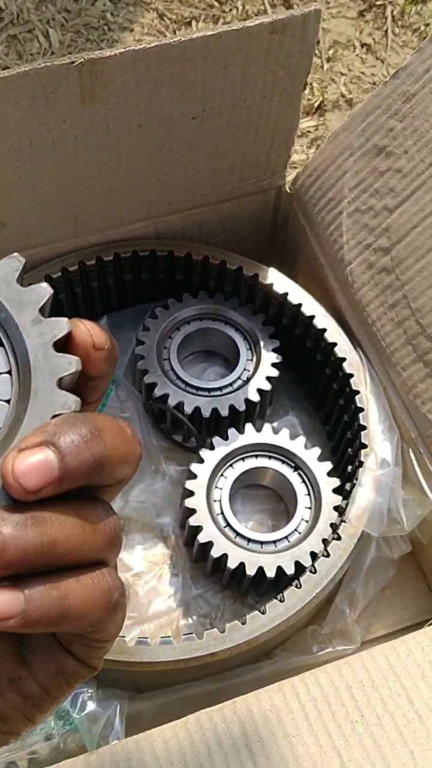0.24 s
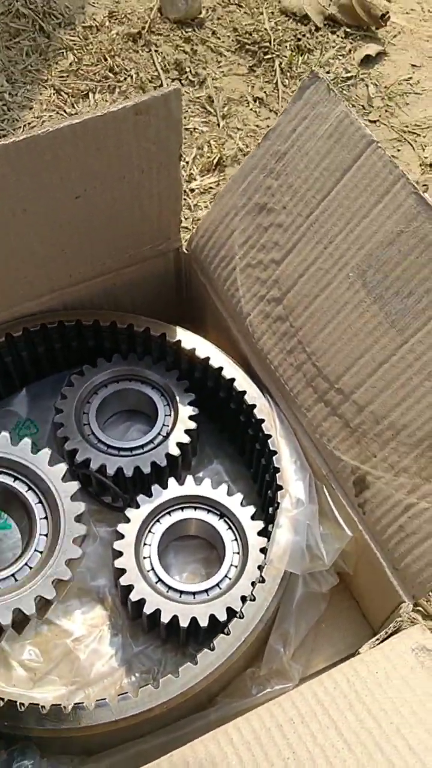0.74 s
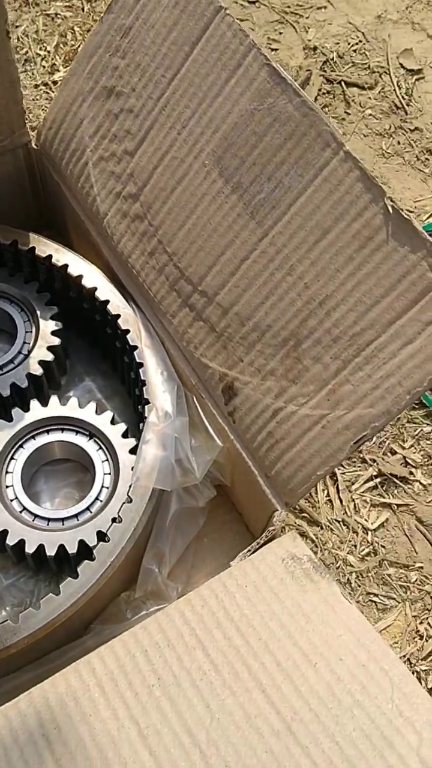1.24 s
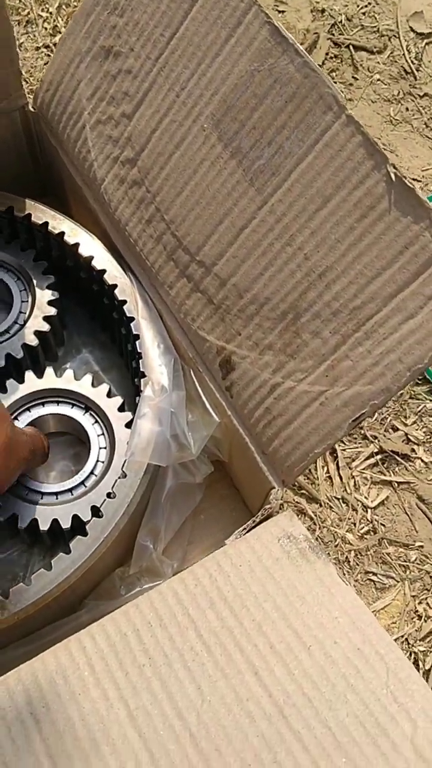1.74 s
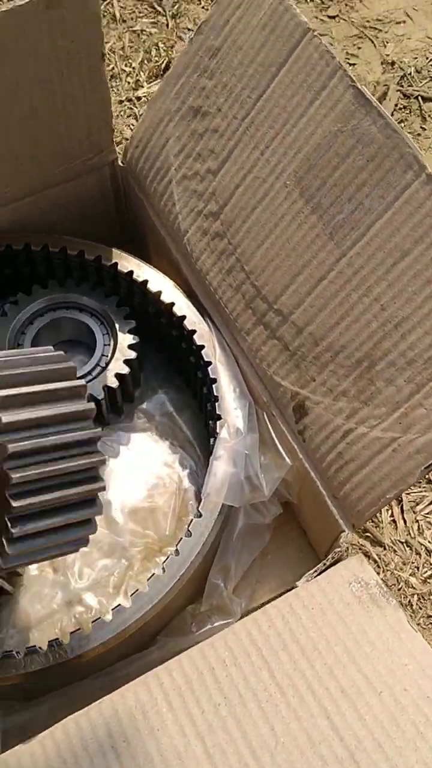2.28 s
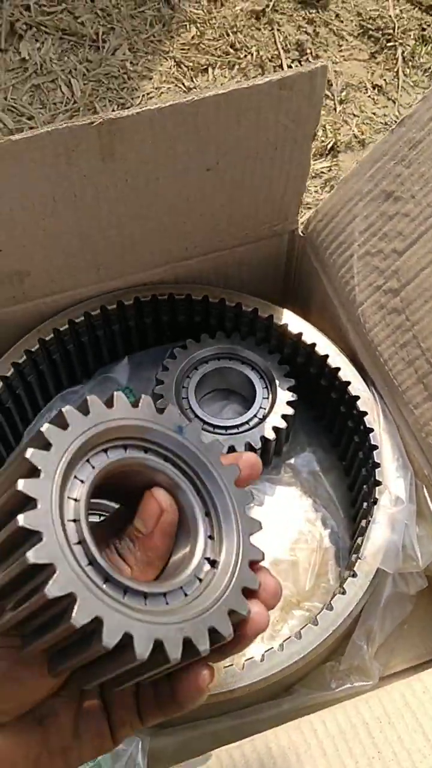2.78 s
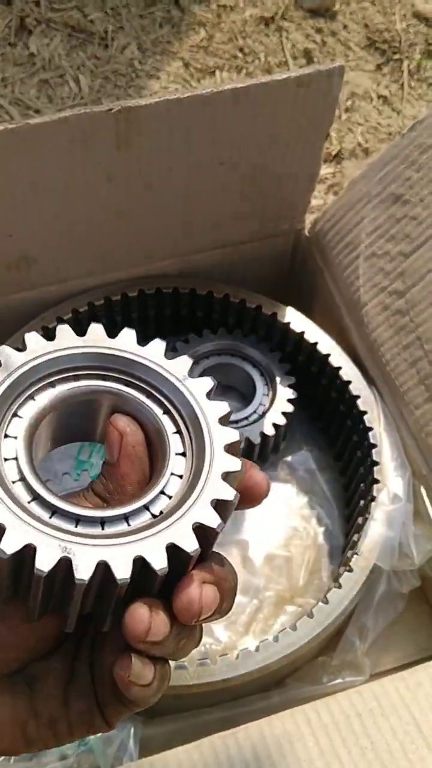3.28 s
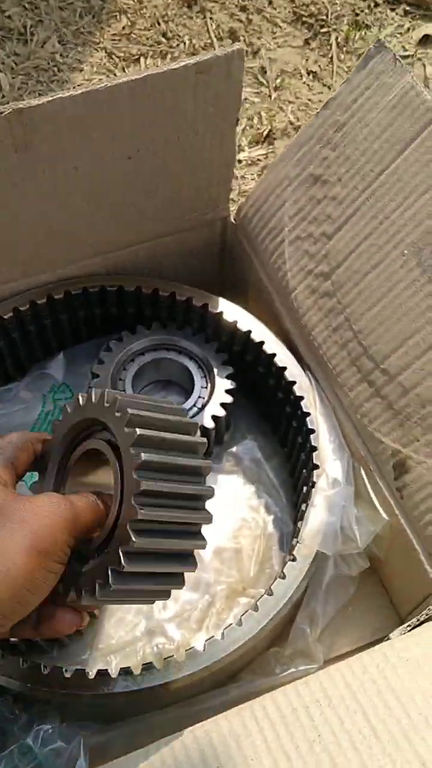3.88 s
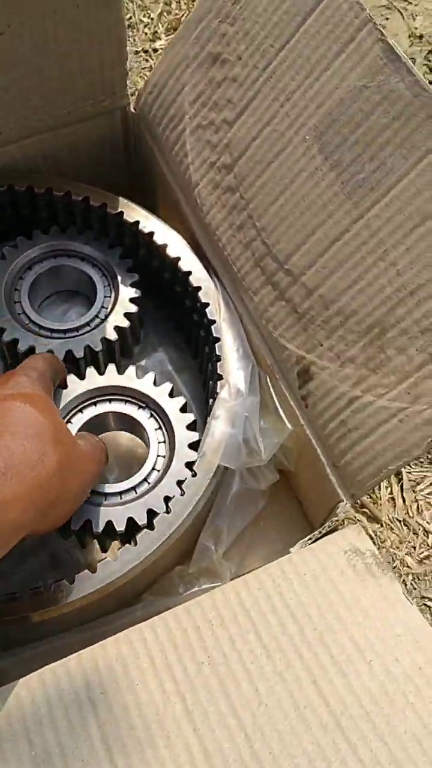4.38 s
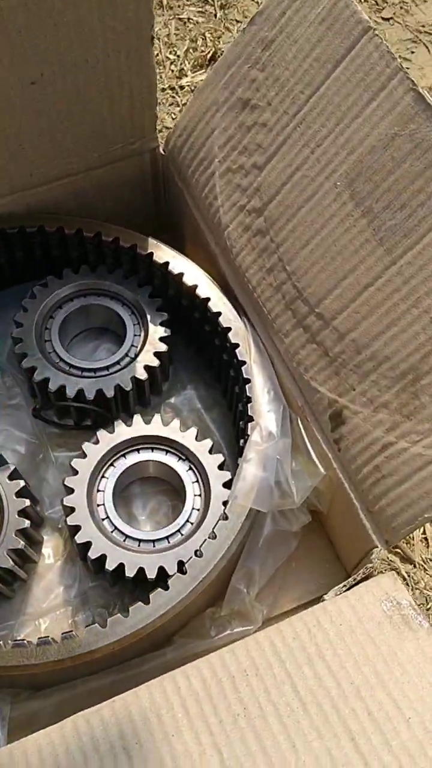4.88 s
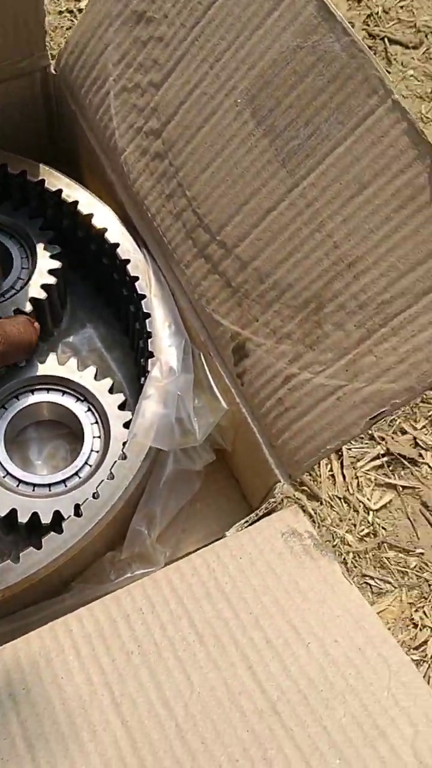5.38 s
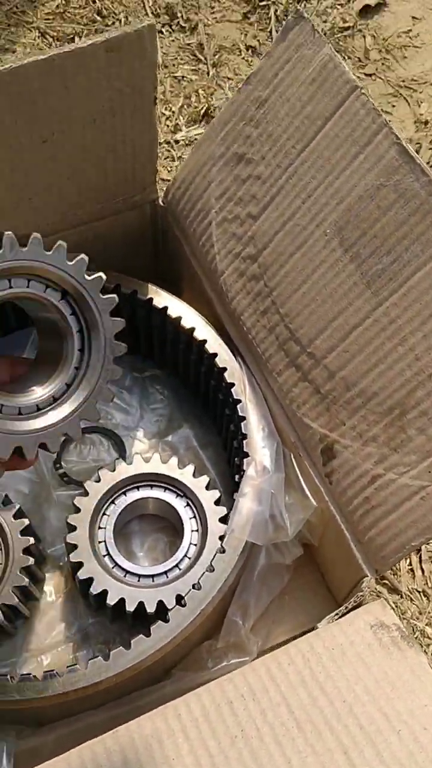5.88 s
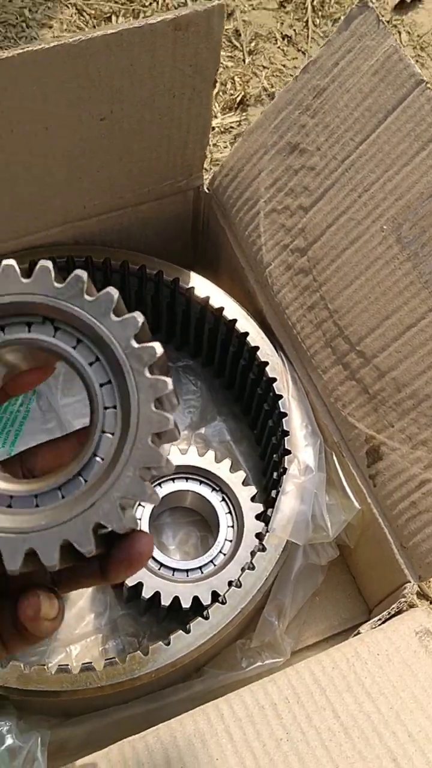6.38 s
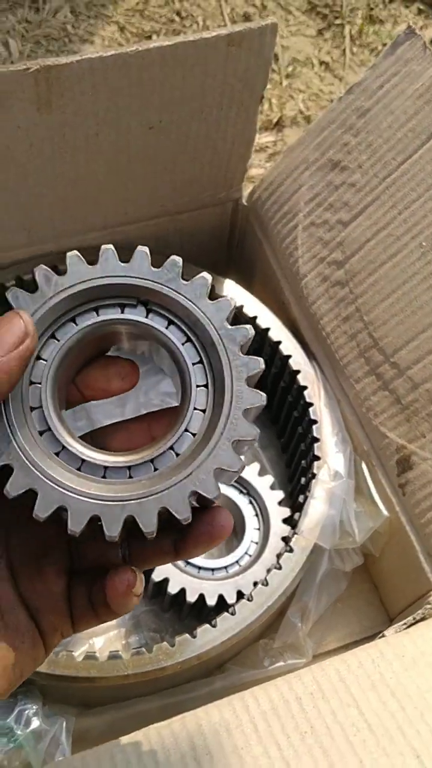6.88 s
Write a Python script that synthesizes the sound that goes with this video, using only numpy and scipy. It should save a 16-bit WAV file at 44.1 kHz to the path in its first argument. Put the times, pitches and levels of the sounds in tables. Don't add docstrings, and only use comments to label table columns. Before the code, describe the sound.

Heavy steel parts are handled in a cardboard box in open air, recorded near by phone. Short, quickly muffled clangs of a big toothed ring alternate with fine gritty ticks, finger rubbing, plastic film crackle and dull box thuds. Lifted gears give thin, high, flickering rings as their rollers brush inside. Faint wind, a far motor and a tiny bird whistle fill the gaps.

```python
import sys
import numpy as np
from scipy import signal
from scipy.io import wavfile
from scipy.ndimage import uniform_filter1d

SR = 44100
rng = np.random.default_rng(int(sys.argv[2]) if len(sys.argv) > 2 else 0)


def volts_from_decibels(level):
    exponent = np.asarray(level, float) / 20
    return 10 ** exponent


def generate_wav(sig):
    pcm = np.round(np.clip(np.atleast_2d(sig).T, -1, 1) * 32767).astype(np.int16)
    wavfile.write(sys.argv[1], SR, pcm)


N = 314874


def evened(x):
    return x / np.sqrt(np.mean(x ** 2) + 1e-20)


def add(mix, start_s, sound):
    part = mix[round(start_s * SR):][:len(sound)]
    part += sound[:len(part)]


def curve(rows, column):
    rows = np.asarray(rows)
    return np.interp(np.arange(N) / SR, rows[:, 0], rows[:, column])


def swells(rows, rest_db, bend):
    t = np.arange(0, N / SR + .01, .002)
    power = volts_from_decibels(2 * rest_db)
    for peak_s, *spans_s, level_db in rows:
        span_s = np.where(t < peak_s, spans_s[0], spans_s[-1])
        fall_db = 20 * (abs(t - peak_s) / span_s) ** bend
        power = power + volts_from_decibels(2 * (level_db - fall_db))
    return np.interp(np.arange(N) / SR, t, 10 * np.log10(power))


def resonate(x, hz, width_hz):
    turn = np.exp(2j * np.pi * np.cumsum(hz * np.ones(len(x))) / SR)
    r = np.exp(-np.pi * width_hz / SR)
    return 2 * (turn * signal.lfilter([1 - r], [1, -r], x / turn)).real


def band(x, lo_hz, hi_hz):
    return signal.sosfilt(signal.butter(2, [lo_hz, hi_hz], "bandpass", fs=SR, output="sos"), x)


def noise(points, patchy_db, flicker_db, size):
    frames, hz = 4 * N // size + 5, np.fft.rfftfreq(size, 1 / SR)
    a, b, patches = rng.standard_normal((frames, len(hz), 3)).T
    patches = uniform_filter1d(patches, size=7, axis=0)
    patches = evened(uniform_filter1d(patches, size=9, axis=1))
    flicker = np.minimum(rng.exponential(1, frames), 4)
    point_hz, point_db = np.transpose(points)
    colour_db = np.interp(np.log(hz + 1), np.log(point_hz + 1), point_db, -90, -90)
    z = (a + 1j * b) * volts_from_decibels(colour_db[:, None] + patchy_db * patches + flicker_db * flicker)
    return evened(signal.istft(z, nperseg=size, noverlap=3 * size // 4)[1][:N])


# freq_hz, density_db
WIND_COLOUR = [(8.8, -34.5), (15, -1), (52, 7), (210, -15), (330, -14), (430, -29), (730, -120)]
# peak_s, swell_and_fade_20db_s, level_db
WIND_GUSTS = [(0, 0.6, -67), (.75, .8, -68), (1.25, 0.7, -58), (1.97, 0.24, -51), (2.75, .6, -57),
              (3.9, .3, -59), (4.25, 0.19, -49), (4.65, .8, -61), (5.1, .6, -58), (5.8, .5, -56),
              (6.2, 1.2, -63)]


def wind():
    level_db = swells(WIND_GUSTS, rest_db=-71, bend=1.3)
    return volts_from_decibels(level_db) * noise(WIND_COLOUR, patchy_db=2.0, flicker_db=0.0, size=4096)


# time_s, firing_hz, level_db
ENGINE_FIRING = [(0, 95, -70), (.6, 99, -63), (1.5, 107, -67), (2.5, 116, -60), (3.0, 105, -64),
                 (3.5, 88, -69), (3.7, 85, -86), (4.3, 99, -80), (4.6, 100, -65), (5.15, 101, -66),
                 (5.4, 98, -78), (7.14, 96, -82)]
ENGINE_ORDERS = [-3, -2.5, -14, -10]
# freq_hz, width_hz, level_db
ENGINE_HUMS = [
    (48.5, 3, -73),
    (288, 8, -77),
]


def engine():
    turns = np.cumsum(curve(ENGINE_FIRING, 1)) / SR
    drone = 0
    for k, order_db in enumerate(ENGINE_ORDERS):
        waver = uniform_filter1d(rng.standard_normal(N), size=5000)
        waver = evened(uniform_filter1d(waver, size=5000))
        drone = drone + volts_from_decibels(order_db + 3.5 * waver) * np.sin(np.pi * (k + 1) * turns + 0.6 * waver)
    out = volts_from_decibels(curve(ENGINE_FIRING, 2) + 3) * drone
    air = rng.standard_normal(N)
    for hz, width_hz, level_db in ENGINE_HUMS:
        out += volts_from_decibels(level_db) * evened(resonate(resonate(air, hz, width_hz), hz, 3 * width_hz))
    return out


# [time_s, pitch_hz]
BIRD_NOTES = [
    (-69, [(2.765, 5600), (2.78, 6050), (2.825, 6250)]),
    (-76, [(2.81, 6200), (2.88, 6450)]),
    (-72, [(2.755, 10300), (2.77, 10650), (2.79, 10400)]),
    (-81, [(2.96, 5740), (3.0, 5740), (3.07, 4200)]),
    (-88, [(6.585, 6540), (6.605, 6900), (6.63, 7180), (6.67, 7330), (6.69, 7220)]),
    (-88, [(6.705, 7050), (6.74, 7380), (6.80, 6950), (6.83, 7150), (6.87, 7750), (6.905, 7950), (6.925, 7450), (7.0, 6800)]),
    (-93, [(6.555, 8650), (6.60, 9650)]),
    (-93, [(6.69, 9150), (6.74, 9150), (6.77, 8800), (6.81, 8800)]),
    (-93, [(6.86, 9000), (6.89, 9000)]),
    (-94, [(6.95, 9450), (7.02, 9450)]),
]


def bird():
    out = np.zeros(N)
    for level_db, rows in BIRD_NOTES:
        time_s, pitch_hz = np.transpose(rows)
        t = np.arange(time_s[0], time_s[-1], 1 / SR)
        glide_hz = np.interp(t, time_s, pitch_hz)
        tone = np.sin(2 * np.pi * np.cumsum(glide_hz) / SR)
        blur = evened(resonate(rng.standard_normal(len(t)), glide_hz, 200))
        blur_share = 1.1 if pitch_hz.mean() < 6500 else 0.3
        add(out, time_s[0], volts_from_decibels(level_db) * (tone + blur_share * blur) * signal.windows.tukey(len(t), .25))
    return out


# peak_s, swell_20db_s, fade_20db_s, level_db
GRIP_BUFFETS = [
    (1.97, .08, .08, -57),
    (2.5, .1, .1, -63),
    (4.25, .12, .12, -52),
    (4.46, .06, .06, -60),
]


def grip():
    thump = evened(band(band(rng.standard_normal(N), 25, 170), 20, 200))
    return volts_from_decibels(swells(GRIP_BUFFETS, rest_db=-110, bend=1.5)) * thump


HANDS_STILL_DB = -87
# freq_hz, density_db
YARD_COLOUR = [(76, -29), (130, -5.5), (256, -15), (294, -11), (317, -8), (484, -14.5), (2620, -15.5),
               (4800, -33.5), (6240, -59.5), (10600, -120)]


def yard(hands_db):
    effort_db = uniform_filter1d(np.minimum(hands_db, -56), size=3500) - HANDS_STILL_DB
    return volts_from_decibels(-73 + .57 * effort_db) * noise(YARD_COLOUR, patchy_db=2.5, flicker_db=1.3, size=1024)


# freq_hz, density_db
RUB_COLOUR = [(1500, -22), (3300, -3.5), (5000, -6), (7600, -1.5), (9300, -10.5), (11500, -14)]


def rub(hands_db):
    return volts_from_decibels(hands_db - 0.5) * noise(RUB_COLOUR, patchy_db=1.5, flicker_db=2.8, size=256)


# freq_hz, density_db
FIZZ_COLOUR = [(8500, -22), (10300, -12), (13000, -5), (15000, 1), (15720, 2)]


def fizz(hands_db):
    return volts_from_decibels(hands_db + 5.5) * noise(FIZZ_COLOUR, patchy_db=2.0, flicker_db=2.5, size=256)


def slips(per_s, spread_db, most):
    strength = volts_from_decibels(spread_db * np.minimum(rng.exponential(1, N), most))
    return strength * (rng.random(N) < per_s / SR) * rng.standard_normal(N)


def crackle(hands_db):
    crease = rng.standard_normal(90) * np.exp(-np.arange(90) / 25)
    pops = signal.oaconvolve(slips(per_s=900, spread_db=4.5, most=4), crease)[:N]
    return volts_from_decibels(np.minimum(hands_db, -54) - 6) * evened(band(pops, 2000, 9000))


# peak_s, swell_20db_s, fade_20db_s, level_db
HAND_STROKES = [(0, .1, .5, -79), (.72, 0.27, 0.18, -65.5), (1.1, 0.54, 0.5, -73),
                (1.262, 0.05, 0.07, -53.5), (1.3, .03, .055, -41), (1.37, 0.07, 0.23, -62),
                (1.68, 0.05, 0.04, -58.5), (1.72, 0.05, 0.01, -58), (1.84, 0.15, 0.05, -61.5),
                (1.93, 0.1, 0.32, -63), (2.075, 0.0553, 0.1829, -55.5), (2.48, .5, 0.36, -62.5),
                (2.73, .3, .05, -67), (3.0, 1, 1, -80.5), (3.97, 0.2, 0.28, -67.5), (4.3, 0.44, 0.7, -73),
                (4.588, 0.0534, 0.0351, -44), (4.62, 0.22, 0.29, -62.5), (5.05, 0.24, 0.22, -65.5),
                (5.38, 0.3, 0.24, -71), (5.57, 0.23, .22, -55.5), (5.975, .3, .04, -62),
                (6.05, 0.3, .45, -71)]


def hands():
    hands_db = swells(HAND_STROKES, HANDS_STILL_DB, bend=1.415)
    return yard(hands_db) + rub(hands_db) + fizz(hands_db) + crackle(hands_db)


# start_s, pitch_hz, level_db
FINGER_PATS = [(4.497, 1300, -36), (4.566, 2050, -30), (4.577, 2200, -27), (4.588, 2100, -31),
               (4.597, 2250, -32), (4.715, 1200, -44), (5.538, 2250, -39), (5.418, 3100, -48),
               (5.605, 2100, -42), (5.615, 2400, -43), (5.642, 2300, -41), (5.655, 2500, -43),
               (5.527, 2150, -37), (4.153, 850, -47), (4.177, 970, -43), (1.684, 2300, -38),
               (1.712, 2300, -40), (1.747, 2250, -32), (2.915, 1000, -51), (2.915, 2000, -51)]


def pats():
    out, t = np.zeros(N), np.arange(1500) / SR
    for start_s, pitch_hz, level_db in FINGER_PATS:
        push = rng.standard_normal(len(t)) * t * np.exp(-t / 0.0029)
        body = resonate(push, pitch_hz, width_hz=140)
        add(out, start_s, volts_from_decibels(level_db) * body / abs(body).max())
    return out


# start_s, grit_on_steel_db, film_snap_db
LIGHT_TICKS = [(0.5292, -63, -45), (1.0844, -44.5, -62), (1.1278, -46, -45), (1.1553, -45.5, -50.5),
               (1.2734, -33, -34), (1.2964, -18, -27), (1.38, -45.5, -32.5), (1.5506, -56, -43),
               (1.6663, -35, -47), (1.8981, -53, -45.5), (3.3316, -49, -40), (3.5074, -53, -51),
               (3.7155, -58, -53), (4.59, -27.5, -50), (4.6907, -44, -55), (3.197, -55, -64),
               (4.753, -43, -42), (4.8294, -47.5, -55), (4.9631, -47, -47), (5.5144, -38, -41),
               (5.6394, -42, -46), (6.3639, -50, -64),
               (1.264, -36, -45), (1.772, -42, -42), (1.9178, -56, -48), (1.9333, -52, -44),
             (1.9717, -50, -50), (1.9936, -47, -50), (2.039, -52, -48), (2.049, -45, -42),
             (2.056, -47, -44), (2.073, -40, -38), (2.122, -40, -40), (2.131, -50, -42), (2.147, -43, -44),
             (3.347, -52, -50), (4.5653, -28, -30), (4.597, -33, -40), (4.666, -40, -48), (4.711, -52, -55),
             (4.725, -50, -55), (4.778, -51, -55), (4.8785, -56, -60), (4.897, -48, -56),
             (4.9803, -46, -50), (5.0272, -52, -54), (5.0377, -49, -52), (5.095, -48, -50)]
# start_s, blow_db, steel_edge_db, film_snap_db
BOX_KNOCKS = [(0.9343, -49.5, -52, -60.5), (1.1742, -25, -46, -53), (1.2535, -29, -21, -38),
              (1.6811, -30.5, -40, -28), (1.709, -40, -32.5, -45), (1.9505, -31, -48, -38),
              (2.6898, -43, -43.5, -43), (2.7137, -44, -39, -41), (2.724, -43, -43, -40),
              (3.3937, -52, -46, -47), (3.4281, -51, -48, -44), (2.7352, -45.5, -50, -42),
              (4.5777, -27, -22, -20), (5.4805, -29, -32, -44), (5.5053, -49, -56, -39),
              (5.5683, -22, -28, -43), (5.665, -33, -38, -41)]
# start_s, blow_db, steel_edge_db, film_snap_db
TOOTH_CLINKS = [(0.618, -44.5, -37.5, -59), (1.3034, -16, -21.5, -32), (1.7469, -31, -29, -29),
                (2.0288, -31.5, -33.5, -31), (2.0822, -17, -31, -20), (2.096, -20, -32, -39),
                (2.105, -26, -55.5, -42), (2.1131, -31, -46.5, -33), (3.3498, -41, -35, -46),
                (4.4273, -21, -44, -53.5), (4.4543, -12, -29, -56), (5.4041, -39, -43.5, -52),
                (5.5242, -38, -31, -50), (5.5851, -29.5, -28, -36), (5.6264, -31.5, -38, -49),
                (6.1597, -44, -50, -54)]
# start_s, thud_db
KNUCKLE_BUMPS = [
    (1.257, -33),
    (1.31, -36),
    (1.335, -40),
    (4.557, -43),
    (4.572, -40),
    (4.61, -44),
    (5.609, -45),
    (2.1452, -38.5),
    (4.6663, -41),
    (6.089, -49.5),
]
# freq_hz, width_hz, level_db
BOX_MODES = [
    (410, 95, 9),
    (310, 60, 2),
]
SNAP_COLOUR = [-1, 3, -1, 2]


def ticks():
    events = LIGHT_TICKS
    for rows, thud_under_blow_db in ((BOX_KNOCKS, -11), (TOOTH_CLINKS, -23.5)):
        for start_s, blow_db, edge_db, film_db in rows:
            events = events + [(start_s, edge_db, film_db, blow_db, blow_db + thud_under_blow_db)]
    for start_s, thud_db in KNUCKLE_BUMPS:
        events = events + [(start_s, thud_db - 14, thud_db - 10, thud_db - 16, thud_db)]

    out, t = np.zeros(N), np.arange(1600) / SR
    push = np.exp(-(t / .0004 - 2) ** 2)
    thud = sum(volts_from_decibels(db) * resonate(push, hz, width_hz) for hz, width_hz, db in BOX_MODES)
    for start_s, *levels_db in events:
        snap = rng.standard_normal(len(t)) * t * np.exp(-t / rng.uniform(0.00031, 0.0015))
        steel = band(snap, 3000, 10000)
        air = band(band(snap, 13000, 17500), 10000, 17500)
        body = band(band(snap, 760, 3600), 800, 3300)
        for part, level_db, colour_db in zip((steel, air, body, thud), levels_db, SNAP_COLOUR):
            add(out, start_s - .0007, volts_from_decibels(level_db + colour_db) * part / abs(part).max())
    return out


# peak_s, swell_20db_s, fade_20db_s, level_db
DRAG_PULLS = [
    (4.24, 0.2, 0.25, -65),
    (4.575, 0.03, 0.0457, -42),
    (4.65, 0.08, 0.16, -53.5),
    (5.1, 0.19, .07, -55.5),
    (5.52, .12, .16, -46),
    (5.64, .1, 0.05, -49),
    (2.5, .12, .1, -60),
]
# freq_hz, width_hz, level_db
DRAGGED_BANDS = [(430, 60, -6), (943, 98, -7), (1155, 34, -1.5), (2150, 200, -5), (2600, 70, -10)]


def drag():
    teeth = slips(per_s=2000, spread_db=4, most=3)
    body = 0
    for hz, width_hz, level_db in DRAGGED_BANDS:
        shaken = resonate(resonate(teeth, hz, 2.8 * width_hz), hz, 5 * width_hz)
        body = body + volts_from_decibels(level_db) * evened(shaken)
    return evened(body) * volts_from_decibels(swells(DRAG_PULLS, rest_db=-110, bend=1.2))


# start_s, level_db, pitch_hz of the loaded rim
ROCK_CONTACTS = [(5.440, -46, 1190), (5.452, -50, 1180), (5.471, -45, 1180), (5.481, -37, 1210),
                 (5.488, -35, 1190), (5.496, -34, 1200), (5.504, -32, 1220), (5.511, -29, 1185),
                 (5.520, -33, 1170), (5.527, -29, 1155), (5.538, -31, 1150), (5.548, -36, 1145),
                 (5.560, -39, 1145), (5.575, -42, 1145)]
# freq_hz, level_db, t60_s
ROCK_SIDE_MODES = [(940, -9, .05), (1400, -6, .03), (2180, -14, .05)]


def rocking():
    start_s, level_db, pitch_hz = np.transpose(ROCK_CONTACTS)
    t = np.arange(start_s[0], start_s[-1] + .06, 1 / SR)
    last = np.searchsorted(start_s, t, "right") - 1
    since = t - start_s[last]
    rim_t60_s = .085
    tone = np.sin(2 * np.pi * np.cumsum(np.interp(t, start_s, pitch_hz)) / SR) * volts_from_decibels(-60 * since / rim_t60_s)
    detune = rng.uniform(.94, 1.06, (len(start_s), len(ROCK_SIDE_MODES)))[last]
    for k, (hz, side_db, t60_s) in enumerate(ROCK_SIDE_MODES):
        tone = tone + volts_from_decibels(side_db - 60 * since / t60_s) * np.sin(2 * np.pi * hz * detune[:, k] * since)
    out = np.zeros(N)
    add(out, start_s[0], tone * uniform_filter1d(volts_from_decibels(level_db[last]), size=30))
    return out


# start_s, level_db
BEARING_TAPS = [
    (3.521, -54.5),
    (3.576, -67.5),
]
# freq_hz, level_db, t60_s
BEARING_MODES = [(7600, -4.5, 0.13), (8430, -26, 0.22), (9800, -26, 0.12), (3220, -4, 0.071)]


def race():
    out, t = np.zeros(N), np.arange(SR // 4) / SR
    for start_s, tap_db in BEARING_TAPS:
        for hz, mode_db, t60_s in BEARING_MODES:
            add(out, start_s, volts_from_decibels(tap_db + mode_db - 60 * t / t60_s) * np.sin(2 * np.pi * hz * t))
    return out


# freq_hz, t60_s, level_db
GEAR_HIGH_MODES = [
    [(3604, .4, 0)],
    [(4896, .4, 0)],
    [(8757, .5, 0), (8795, .2, -5)],
    [(11545, .25, 0), (5930, .4, -12)],
    [(13540, .3, -2.5), (14137, .8, -10)],
]
# freq_hz, t60_s, level_db
GEAR_LOW_MODES = [
    [(1326, 0.43, 0)],
    [(1754, 0.5, 0)],
    [(2335, 0.57, 0)],
    [(3400, .6, 0)],
]
# start_s, level_db, free_s until a touch
FIRST_LIFT_STRIKES = [
    [(1.972, -62, .023), (2.119, -54, .045)],
    [(1.99, -62, .13), (2.119, -62, .11)],
    [(1.972, -60, .02), (1.99, -55, .03), (2.049, -54, .07), (2.16, -49, .065)],
    [(1.772, -52, 0.04), (1.993, -54, .012), (2.073, -48, .01), (2.083, -34.5, 0.014), (2.119, -43, .07)],
    [(1.772, -45, .043), (1.972, -50, .05), (2.049, -45.5, .034), (2.083, -35, 0.033), (2.119, -39, .04),
     (2.16, -46.5, .065)],
    [(2.122, -55, .026), (2.148, -48, 0.016)],
    [],
    [(2.032, -56, .015), (2.05, -50, .028), (2.122, -53, .043)],
]
SECOND_LIFT_STRIKES = [
    [(5.505, -43, .045), (5.597, -45, .03), (5.627, -43, .03), (5.658, -44, .02), (5.682, -46, .018),
     (5.703, -42, .012), (5.724, -42, .012), (5.745, -53, .04)],
    [(5.515, -55, .08), (5.597, -56, .08), (5.682, -33, .021), (5.725, -56, .09)],
    [(5.505, -48, .09), (5.597, -49, .125), (5.725, -44.5, .075)],
    [(5.505, -37.5, .025), (5.53, -50, .07), (5.682, -48, .06)],
    [(5.468, -50, .04), (5.505, -43, .03), (5.53, -43, .04), (5.57, -41, .03), (5.597, -43, .045),
     (5.64, -43, .045), (5.682, -43, .045), (5.725, -49, .09)],
    [(5.678, -48, .027), (5.737, -60, .053)],
    [(5.69, -55, .05), (5.737, -51.5, .14)],
    [(5.43, -56, .06), (5.678, -53, .027), (5.737, -57, .1)],
    [(5.95, -68, .08), (6.03, -66, .07)],
]


def gear(lift):
    touch_db, held_db_per_s = -11, -160
    out = np.zeros(N)
    for strikes, modes in zip(lift, GEAR_HIGH_MODES + GEAR_LOW_MODES):
        if not strikes:
            continue
        start_s, level_db, free_s = np.transpose(strikes)
        t = np.arange(start_s[0], start_s[-1] + .22, 1 / SR)
        last = np.searchsorted(start_s, t, "right") - 1
        since = t - start_s[last]
        held = since - free_s[last]
        db = level_db[last] + (held > 0) * (touch_db + held_db_per_s * held)
        db = db + 3.8 * evened(uniform_filter1d(rng.standard_normal(len(t)), size=300))
        onset = np.minimum((t - t[0]) / .002, 1)
        for hz, t60_s, mode_db in modes:
            size = uniform_filter1d(volts_from_decibels(db + mode_db - 60 * since / t60_s), size=130) * onset
            add(out, t[0], size * np.sin(2 * np.pi * (hz * t + rng.random())))
    return out


RING_MODES_HZ = [415, 953, 1102, 1138, 1410, 2090, 2161, 2607, 3447, 4362, 4982, 5965, 6121, 6342, 6740,
                 7946, 8400, 8705, 9878, 10850, 13200, 15600]
# t60_s, place0_db, place1_db, place2_db, place3_db
RING_DECAYS = [(0.15, -34.5, -32, -44, -44), (0.3, -35.5, -32, -32, -41), (0.057, -27.5, -30.5, -33, -20),
               (0.16, -12.5, -15, -29, -29), (0.07, -21, -23.5, -36, -33), (0.14, -32, -24, -31, -30),
               (0.2, -21.5, -9.5, -18, -18), (0.113, -43, -31, -29, -10.5), (0.21, -33, -21.5, -43, -26),
               (0.11, -58, -40, -51, -26), (0.3, -54, -47, -51, -43), (0.56, -58.5, -49, -63, -46),
               (0.14, -70.5, -64.5, -56.5, -35), (0.08, -66.5, -59.5, -63, -37),
               (0.3, -53, -44, -55, -54.5), (0.1, -59.5, -60.5, -52, -43), (0.35, -68, -52, -71.5, -52),
               (0.26, -77.5, -47, -69, -62), (0.14, -78, -60, -68.5, -53), (0.12, -59, -58, -64.5, -58),
               (0.15, -64, -54, -66.5, -68.5), (0.1, -67.5, -48.5, -65, -50)]
# start_s, blow_db, extra_1k1_db, extra_2k2_db, free_s until a contact muffles the low modes
RING_BLOWS = [
    [(1.1735, -3, -1, -3, .020), (1.186, -11, 0, -6, .008), (1.284, -17, 2, 8, .018),
     (4.583, -11, -5, -9, .018), (4.663, -18, -1, -8, .012)],
    [(1.305, -1, -3, -1, .042), (1.198, -23, -12, 7, .016), (1.268, -30, -10, 3, .012)],
    [(4.427, -1, 2, 0, .027), (1.945, -15, 8, -1, .03)],
    [(4.455, 0, -1, -2, .012), (4.435, -13.5, 3, 4, .018)],
]


def ring():
    out, t = np.zeros(N), np.arange(16500) / SR
    hz = np.array(RING_MODES_HZ)[:, None]
    t60_s, *places_db = np.transpose(RING_DECAYS)[:, :, None]
    phase = rng.random(hz.shape)
    low = (hz != RING_MODES_HZ[1]) & (hz < 2300)
    near_1k1 = hz < 1500
    muffling_s, muffled_db = np.where(near_1k1, .010, .022), np.where(near_1k1, -17, -12)
    firm_db, glancing_loss_db_per_db, glancing_hz = -12, 3, 3000
    rattle_db, rattle_t60_s = -40, .2
    for place_db, blows in zip(places_db, RING_BLOWS):
        for start_s, blow_db, extra_1k1_db, extra_2k2_db, free_s in blows:
            db = blow_db + place_db + low * np.where(near_1k1, extra_1k1_db, extra_2k2_db) - 60 * t / t60_s
            db = db + (hz > glancing_hz) * glancing_loss_db_per_db * min(blow_db - firm_db, 0)
            muffle = np.clip((t - free_s) / muffling_s, 0, 1)
            chatter = rng.standard_normal((len(hz), len(t)))
            chatter = evened(uniform_filter1d(chatter, size=180, axis=1))
            db = db + .8 * chatter + low * muffle * (muffled_db + 3.5 * chatter)
            modes = volts_from_decibels(db) * np.sin(2 * np.pi * (hz * (round(start_s * SR) / SR + t) + phase))
            rattle = evened(band(rng.standard_normal(len(t)), 350, 1700))
            rattle = rattle * volts_from_decibels(blow_db + rattle_db - 60 * t / rattle_t60_s)
            onset = np.minimum(t / (.0016 - .00008 * blow_db), 1)
            add(out, start_s, (modes.sum(0) + rattle) * onset)
    return out


def box_echo(x):
    t = np.arange(3000) / SR
    sparse = (rng.random(len(t)) < .05) * (t > .001)
    taps = rng.choice([-1., 1.], len(t)) * sparse * volts_from_decibels(-60 * t / .045)
    return signal.oaconvolve(x, taps / np.linalg.norm(taps))[:N]


def scene():
    far = wind() + engine() + bird()
    small = ticks() + drag() + pats()
    steel = ring() + rocking() + gear(FIRST_LIFT_STRIKES) + gear(SECOND_LIFT_STRIKES) + race()
    echo = box_echo(volts_from_decibels(-11) * small + volts_from_decibels(-19) * steel)
    return (far + grip() + hands() + small + steel + echo)[None]


def roll_off(x):
    return signal.sosfilt(signal.butter(12, 17000, fs=SR, output="sos"), x)


def record(dry):
    edge = signal.firwin(255, 16700, window=("kaiser", 9), fs=SR)
    mix = signal.oaconvolve(dry, edge[None], "same")
    return roll_off(mix)


dry = scene()
out = record(dry)
generate_wav(out)
```